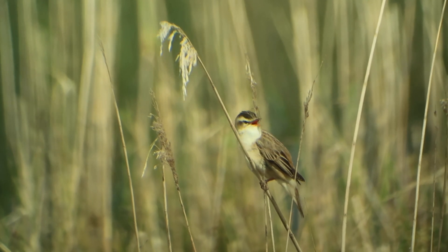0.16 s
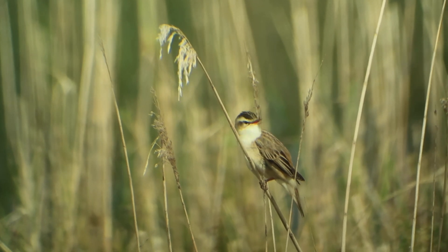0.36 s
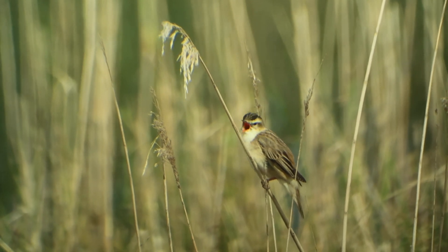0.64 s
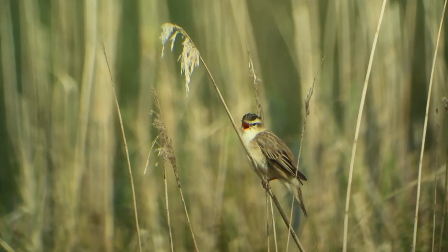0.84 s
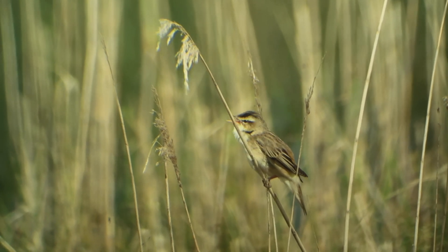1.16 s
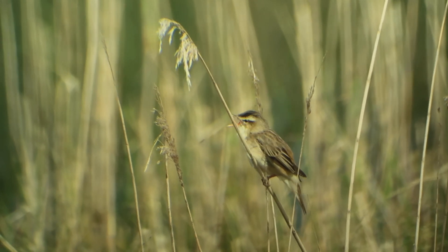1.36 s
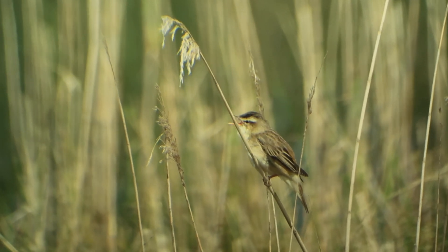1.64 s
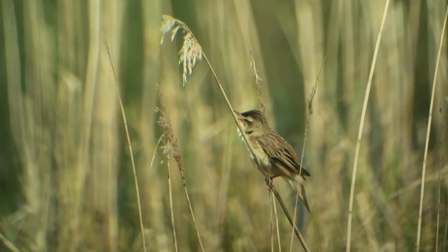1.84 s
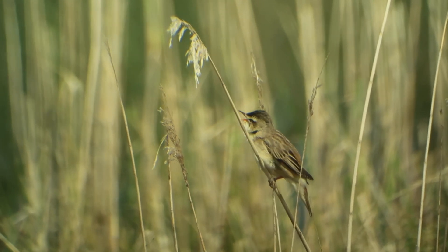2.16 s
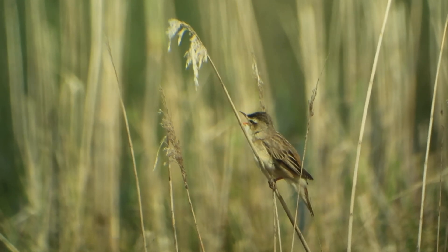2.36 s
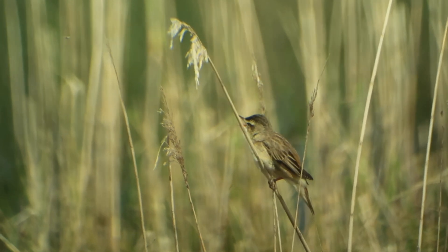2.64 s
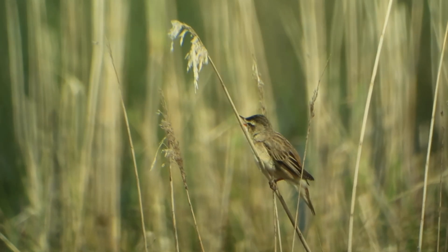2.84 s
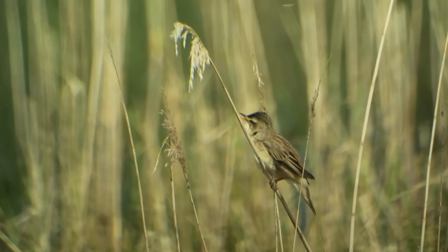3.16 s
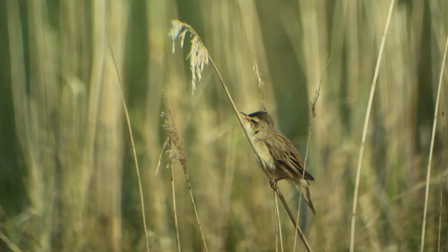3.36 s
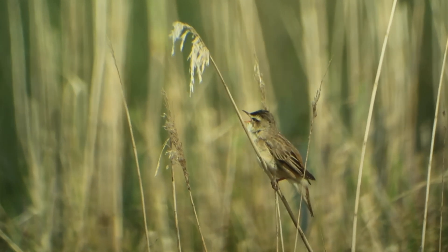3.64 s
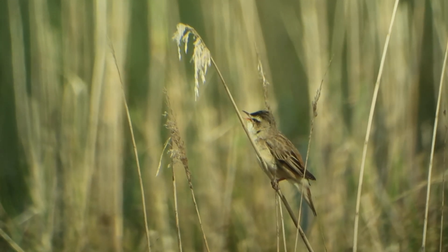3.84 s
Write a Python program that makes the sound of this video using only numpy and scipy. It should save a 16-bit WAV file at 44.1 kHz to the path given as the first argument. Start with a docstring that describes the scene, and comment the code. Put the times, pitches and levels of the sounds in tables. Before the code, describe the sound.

A small warbler sings fast harsh chattering churrs and hissing double chips in a breezy reedbed.

```python
"""Reedbed: a sedge warbler on a stem alternates hissing double chips with harsh four-note churrs.
A churr note mixes an arching harmonic buzz, a falling upper voice and noise; a chip is steadied noise.
A second warbler, off to the right, churrs along and comes to the fore; thin gliding whistles slip in.
The reeds scatter the song as decaying noise echoes and rush softly; faint high ticks are noise bursts.
From halfway on, eddies of wind thump on the microphone as brief swings amid puffs of dull noise."""
import sys
import numpy as np
from scipy import signal
from scipy.fft import rfft, irfft, next_fast_len
from scipy.io import wavfile
from scipy.ndimage import uniform_filter1d, map_coordinates

SR = 44100
rng = np.random.default_rng(int(sys.argv[2]) if len(sys.argv) > 2 else 0)


def put_to_file(sound):
    """Save the sound as 16-bit audio at rate SR, in the file named by the first command-line argument."""
    columns = np.atleast_2d(sound).T  # one column per channel
    safe = np.clip(columns, -1, 1)
    whole_steps = np.round(safe * 32767)
    wavfile.write(sys.argv[1], SR, whole_steps.astype(np.int16))


N = 176400
T = np.arange(N) / SR
HALF = np.array([[.5], [-.5]])  # splits a left-right difference between the ports


def amp(db):
    """Decibels to gain."""
    return 10 ** (np.asarray(db) / 20)


def unit(x):
    """Scale to rms 1."""
    return x / np.sqrt(np.mean(abs(x) ** 2) + 1e-20)


def along(points, hz):
    """Interpolate (Hz, value) points on a log frequency axis."""
    f, v = np.transpose(points)
    return np.interp(np.log(hz + 1), np.log(f + 1), v)


def filtered(x, response):
    """Multiply the spectrum of x by a complex response of frequency."""
    n = x.shape[-1]
    m = next_fast_len(n + 2048)
    hz = np.fft.rfftfreq(m, 1 / SR)
    return irfft(rfft(x, m) * response(hz), m)[..., :n]


def noise(spectrum, n, shift=1):
    """Coloured noise of rms 1, its spectrum scaled in frequency by shift."""
    white = rng.standard_normal(n)
    return unit(filtered(white, lambda hz: amp(along(spectrum, hz / shift))))


def steadied(x, span_s):
    """Noise with its swings in strength evened out, as in a chaotic oscillation."""
    power = uniform_filter1d(abs(signal.hilbert(x)) ** 2, max(1, int(span_s * SR)))
    return unit(x / np.sqrt(abs(power) + 1e-3))


def swell(t, length_s, edge):
    """Rounded rise and fall about t = 0; a higher edge steepens the flanks."""
    return np.exp(-abs(2 * t / length_s) ** edge)


def around(centre_s, reach_s):
    """Samples within reach of a time, and their times from it."""
    part = slice(max(0, int((centre_s - reach_s) * SR)), int((centre_s + reach_s) * SR))
    return part, T[part] - centre_s


def wander(t, size, per_s):
    """Smooth random course, unit normal points joined at per_s points a second."""
    return map_coordinates(rng.standard_normal(size), [(t - t[0]) * per_s], mode="wrap")


def churr_note(t, length_s, pitch_hz, fizz_db, rasp_db, upper_db, fall_hz_per_s, upper_share):
    """Two voices at once, an arching buzz and a falling whistle above it, with rasp and bright fizz."""
    # Colour of the buzz's overtones. Each row: frequency in Hz, level in dB.
    throat = [(1500, -49.5), (2250, -19), (2520, -31), (2800, 0), (3100, 0), (3450, -2.5), (3800, -27.5),
              (4100, -8.5), (4550, -7), (4900, 0.5), (5400, -29), (6100, -28.5), (7000, -40), (9000, -44.5)]
    # Colour of the rasp at its reference pitch. Each row: frequency in Hz, level in dB.
    rasp_colour = [(1500, -58.5), (2300, -15.5), (2650, -29.5), (3080, 4.5), (3600, -26), (4000, 1),
                   (4500, 9.5), (5100, 1), (5550, -34), (6600, -27.5), (7500, -41), (9500, -58.5),
                   (12500, -37), (16000, -64)]
    # Colour of the fizz. Each row: frequency in Hz, level in dB.
    fizz_colour = [(3500, -35.5), (4800, -6.5), (5350, 7.5), (5680, -4), (6050, 8.5), (6400, -10),
                   (6900, -28), (8000, -46.5), (10000, -49)]
    arch, sag, jitter_depth = .036, .014, .008  # shares of the pitch
    rasp_pitch_hz, rasp_length_ratio, rasp_lead_s = 787.6, 1.2, .0006
    upper_ratio, upper_lag_s, edge = 5.82, .001, 3

    u = np.clip(2 * t / length_s, -1.5, 1.5)
    jitter = jitter_depth * wander(t, 256, 700)
    hz = pitch_hz * (1 + rng.normal(0, .012) - arch * u ** 2 - sag * u + jitter)
    phase = 2 * np.pi * np.cumsum(hz) / SR
    buzz = unit(sum(amp(along(throat, k * hz)) * np.sin(k * phase + 2 * np.pi * rng.random())
                    for k in range(2, 11)))

    late_t = t - upper_lag_s
    upper_hz = upper_ratio * hz + fall_hz_per_s * late_t
    upper = unit(np.sin(2 * np.pi * (np.cumsum(upper_hz) / SR + rng.random())))

    rasp = steadied(noise(rasp_colour, len(t), pitch_hz / rasp_pitch_hz), .004)
    rough = amp(rasp_db) * rasp + amp(fizz_db) * noise(fizz_colour, len(t))

    return (buzz * swell(t, length_s, edge)
            + amp(upper_db) * upper * swell(late_t, length_s * upper_share, edge)
            + rough * swell(t + rasp_lead_s, length_s * rasp_length_ratio, 2))


def churrs(rows, notes, upper_share):
    """Each churr is a run of four quick notes with its own accents."""
    out = np.zeros(N)
    for first_s, levels_db, pitch_hz, fizz_db, *voice in rows:
        for db, (delay_s, length_s, step_hz, note_fizz_db) in zip(levels_db, notes):
            part, t = around(first_s + delay_s, .023)
            note = churr_note(t, length_s, pitch_hz + step_hz, fizz_db + note_fizz_db, *voice, upper_share)
            out[part] += amp(db) * note
    return out


def chips():
    """Pairs of chaotic hiss bursts, the second mostly stronger, each with a weak octave by squaring."""
    # Double chips; the overtone is strong while the bird faces the microphone.
    # Each row: centre of first note in seconds, levels of the two notes in dB, centre frequency in Hz,
    # overtone in dB.
    chip_rows = [(0.024, (-44, -39.5), 5440, -24), (0.113, (-44.5, -43), 5230, -23.5), (.585, (-49.5, -43),
                 5390, -27.5), (.662, (-45.5, -41.5), 5540, -23), (0.749, (-42.5, -39.5), 5580, -28),
                 (.833, (-44, -41), 5500, -26.5), (.922, (-43, -41.5), 5420, -32), (1.009, (-43.5, -45),
                 5460, -28), (1.487, (-44, -42.5), 5470, -52), (1.564, (-46, -43), 5530, -36),
                 (1.650, (-43.5, -43.5), 5450, -35.5), (1.732, (-46.5, -46), 5460, -38), (1.829, (-48, -43),
                 5550, -41), (2.471, (-44, -41.5), 5330, -39), (2.555, (-43.5, -40), 5430, -59),
                 (2.649, (-45, -41), 5460, -59), (2.729, (-43.5, -41), 5390, -66), (2.826, (-44, -43),
                 5600, -38), (2.913, (-40.5, -41.5), 5410, -45.5)]
    # Notes of a chip. Each row: delay in seconds, length in seconds.
    chip_notes = [(0, .0095), (.0205, .0148)]
    # Colour of the hiss at its reference centre. Each row: frequency in Hz, level in dB.
    hiss_colour = [(1400, -41.5), (2300, -13), (2700, -23), (3150, -10.5), (3700, -27), (4300, -3.5),
                   (4900, 2.5), (5800, 1), (6700, 4), (7200, -25), (8000, -20.5), (9000, -61), (16000, -81)]
    # Colour of the octave. Each row: frequency in Hz, level in dB.
    octave_colour = [(8000, -16), (10500, -15.5), (12500, -11.5), (13800, 11), (15000, -11)]
    reference_hz = 5414

    out = np.zeros(N)
    for first_s, levels_db, centre_hz, overtone_db in chip_rows:
        for db, (delay_s, length_s) in zip(levels_db, chip_notes):
            part, t = around(first_s + delay_s, .023)
            hiss = steadied(noise(hiss_colour, len(t), centre_hz / reference_hz), .003)
            squared = (signal.hilbert(hiss) ** 2).real
            octave = unit(filtered(squared, lambda hz: amp(along(octave_colour, hz))))
            out[part] += amp(db) * swell(t, length_s, 2.1) * (hiss + amp(overtone_db) * octave)
    return out


def near_warbler():
    """The near bird's churrs, with a brief upper voice, and its chips."""
    # Churrs. Each row: centre of first note in seconds, levels of the four notes in dB, pitch in Hz,
    # fizz in dB, rasp in dB, upper voice in dB, slope of the upper voice in Hz per second.
    churr_rows = [(.206, (-44.5, -43, -44.5, -45), 765, -5.5, -5, -11, -20000),
                  (.389, (-46, -44, -43.5, -47), 766.6, -16, -8, -3, -15000),
                  (1.115, (-52, -48, -49.5, -47.5), 793, 0, 2.5, 0, -50000),
                  (1.279, (-49, -47.5, -51.5, -47.5), 777.4, -20, -0.5, 1, -30000),
                  (1.953, (-51, -47, -47.5, -47), 786.6, -17, -1.5, 1.5, -60000),
                  (2.103, (-49, -46.5, -49.5, -47.5), 822, -20, -3.5, 1, -50000),
                  (2.288, (-51.5, -50, -49, -48.5), 782.3, -9.5, 2.5, 2.5, -60000),
                  (3.017, (-52.5, -48.5, -51.5, -50.5), 777, 5, 5.5, 8, -80000),
                  (3.183, (-48.5, -48.5, -48.5, -50), 790, -8, 5, 3.5, -90000),
                  (3.356, (-52.5, -48, -53, -48.5), 785, -7, 3, 5.5, -100000),
                  (3.528, (-49.5, -53, -51, -49), 783, -4.5, 6.5, 1.5, -90000),
                  (3.704, (-53, -52.5, -52, -51.5), 781.4, -0.5, 1, 6.5, -80000),
                  (3.866, (-50, -47, -51, -50.5), 779, -14, 2.5, 2, -80000)]
    # Notes of a churr. Each row: delay in seconds, length in seconds, pitch above the churr's in Hz,
    # added fizz in dB.
    churr_notes = [(0, .0095, 0, 0), (.0213, .0105, -3, -6), (.0475, .0115, 6, -7), (.0765, .0125, -3, -8)]
    return churrs(churr_rows, churr_notes, upper_share=.68) + chips()


def second_warbler():
    """The second bird's churrs, with one set of accents and one voice for all."""
    # Churrs. Each row: centre of first note in seconds, level before accents in dB, pitch in Hz.
    far_churrs = [(0.06, -58.5, 779), (0.275, -64.5, 777), (0.458, -65.5, 785), (0.65, -65.5, 803),
                  (0.824, -66.5, 813), (1.197, -72.5, 780), (1.438, -65.5, 793), (1.633, -65.5, 808),
                  (1.827, -61, 784), (1.993, -56.5, 780), (2.173, -57, 781), (2.35, -56.5, 778),
                  (2.53, -59, 782), (2.830, -50, 767), (2.989, -48.5, 783), (3.174, -50.5, 792),
                  (3.361, -48, 790.5), (3.534, -50, 786.5), (3.7, -49.5, 767), (3.887, -49.5, 782)]
    # Notes of a churr. Each row: delay in seconds, length in seconds, pitch above the churr's in Hz,
    # added fizz in dB.
    far_notes = [(0, .018, -10, 0), (.022, .015, 0, 0), (.045, .014, 5, 0), (.067, .013, -15, 0)]
    # Accents of the four notes, in dB.
    accents_db = np.array([-8.5, 0.5, 1, -2.5])
    fizz_db, rasp_db, upper_db, fall_hz_per_s = -9.5, -3, 2.5, -12000

    rows = [(s, db + accents_db, pitch_hz, fizz_db, rasp_db, upper_db, fall_hz_per_s)
            for s, db, pitch_hz in far_churrs]
    return churrs(rows, far_notes, upper_share=1)


def whistles():
    """Short sine glides with a slight random quaver."""
    # Each row: centre in seconds, length in seconds, level in dB, pitch in Hz, glide in Hz per second.
    whistle_rows = [(1.036, 0.062, -48, 5550, -1800), (1.45, 0.015, -57, 6030, 74997),
                    (2.828, 0.028, -56, 5260, -1000), (2.892, 0.021, -55.5, 5370, -6),
                    (2.967, 0.027, -49.5, 5270, -5000)]
    quaver_hz, quaver_per_s = 70, 500

    out = np.zeros(N)
    for s, length_s, db, pitch_hz, glide_hz_per_s in whistle_rows:
        part, t = around(s, length_s)
        hz = pitch_hz + glide_hz_per_s * t + quaver_hz * wander(t, 64, quaver_per_s)
        tone = unit(np.sin(2 * np.pi * np.cumsum(hz) / SR))
        out[part] += amp(db) * swell(t, length_s, 2.5) * tone
    return out


def placed(x, lead, pan):
    """A source as the left and right ports hear it, by phase lead and level per frequency."""
    return filtered(x, lambda hz: amp(HALF * along(pan, hz)) * np.exp(1j * HALF * along(lead, hz)))


def scatter(x, t60_s):
    """Diffuse echo from swaying stems: a decaying noise tail, redrawn for every sixth of a second."""
    out = np.zeros((2, N + SR))
    t = np.arange(SR // 3) / SR
    block = SR // 6
    for i in range(0, N, block):
        decay = amp(-60 * t / t60_s) * (1 - np.exp(-t / .004))
        tail = rng.standard_normal((2, len(t))) * decay
        echo = signal.fftconvolve(x[None, i:i + block], tail / np.linalg.norm(tail[0]), axes=1)
        out[:, i:i + echo.shape[1]] += echo
    return out[:, :N]


def eddies():
    """Each eddy shoves the diaphragm for little more than one swing, sharply, then settling and slowing."""
    # Each row: time in seconds, envelope peak in dB, pitch in Hz, left-right difference in dB.
    eddy_rows = [(2.082, -40, 101.7, 5.5), (2.254, -26.5, 106, 8.5), (2.391, -38, 138, 4),
                 (2.416, -28.5, 156.7, 4.5), (2.457, -21.5, 143.2, 7), (2.482, -24, 141.5, 6.5),
                 (2.641, -34, 134.5, 0.5), (2.654, -37.5, 250, 7), (2.674, -40.5, 134, 6.5),
                 (2.715, -36, 117.7, -12), (2.753, -29.5, 197.2, 6), (2.794, -43.5, 114, -12),
                 (2.922, -42.5, 101.6, -1.5), (2.943, -32, 163.5, -9), (3.321, -40.5, 112.3, 10.5),
                 (3.601, -24.5, 140.4, -6.5), (3.659, -32, 152.5, 6), (3.901, -30, 127.3, 6.5),
                 (3.945, -34.5, 177, 7)]
    rise_cycles, fall_cycles, skew_cycles, slowing_share = .28, .42, .16, .201

    out = np.zeros((2, N))
    for s, db, hz, pan_db in eddy_rows:
        part, t = around(s, .05)
        cycles = hz * t
        shape = np.exp(1 - np.hypot(1, cycles / np.where(t < 0, rise_cycles, fall_cycles)))
        port_phase = HALF * rng.normal(0, skew_cycles)
        phase = np.cumsum(hz * (1 - slowing_share * np.tanh(cycles))) / SR + rng.random()
        out[:, part] += amp(db + HALF * pan_db) * shape * np.sin(2 * np.pi * (phase + port_phase))
    return out


def puffs():
    """Dull turbulence flutters on the microphone, mostly alike in both ports but harder on one."""
    # Each row: centre in seconds, length in seconds, level before the low-pass in dB,
    # left-right difference in dB.
    puff_rows = [(0.091, 0.026, -59, -3), (2.098, 0.04, -51.5, 6), (2.276, 0.04, -47.5, 5),
                 (2.347, 0.043, -46.5, 3), (2.407, 0.05, -42.5, 5.5), (2.475, .05, -40.5, 6),
                 (2.554, 0.14, -53.5, 7), (2.653, 0.054, -40.5, 9), (2.763, 0.051, -48.5, -5),
                 (2.85, 0.16, -56, -2), (2.951, 0.05, -46.5, -6), (3.014, 0.14, -54.5, 5),
                 (3.61, 0.028, -39, -3), (3.658, 0.037, -46, 8), (3.931, 0.05, -48.5, 9),
                 (3.977, 0.15, -49, -3.5)]
    # Colour of the turbulence before the low-pass. Each row: frequency in Hz, level in dB.
    buffet = [(20, -29), (45, -12.5), (80, -8), (125, -7.5), (180, -13.5), (250, -18), (400, -27),
              (700, -42.5), (2000, -84)]
    edge, side_db, top_hz = 1.7, -11, 416

    push = np.sqrt(sum((amp(db + HALF * pan_db) * swell(T - s, length_s, edge)) ** 2
                       for s, length_s, db, pan_db in puff_rows))
    mid = steadied(noise(buffet, N), .02)
    side = amp(side_db) * noise(buffet, N)
    flutter = push * np.array([mid + side, mid - side])
    return filtered(flutter, lambda hz: 1 / np.sqrt(1 + (hz / top_hz) ** 4))


def reedbed():
    """A soft low rush, shared in part by the ports, with a faint independent rustle above it."""
    # Colour of the breeze in the reedbed. Each row: frequency in Hz, level in dB.
    air = [(15, -47.5), (25, -14), (79, -2.5), (140, 0), (214, -3), (437, -2.5), (586, -7), (716, -7),
           (1150, -10), (1630, -17), (2000, -22.5), (2600, -54.5), (4400, -120)]
    # Likeness of the breeze in the ports. Each row: frequency in Hz, left-right correlation (0 to 1).
    air_alike = [(60, 1), (160, 0.9), (410, 0.23), (1080, 0.0054), (2820, 0.14), (7370, 0.25)]
    # Colour of the rustle. Each row: frequency in Hz, level in dB.
    rustle_colour = [(1200, -27.5), (2000, -5), (3000, -5), (4600, -9), (5600, -7), (7200, -6),
                     (8700, -20.5), (11000, -28.5), (14000, -28), (16000, -39.5)]
    air_db, rustle_db = -62, -70

    def mid_side_gains(hz):
        """Shares of mid and side that give the likeness."""
        turn = np.arccos(np.clip(along(air_alike, hz), 0, 1)) / 2
        return np.array([np.cos(turn), np.sin(turn)])

    mid, side = filtered(np.array([noise(air, N), noise(air, N)]), mid_side_gains)
    rush = amp(air_db) * np.array([mid + side, mid - side])
    rustle = amp(rustle_db) * np.array([noise(rustle_colour, N), noise(rustle_colour, N)])
    return rush + rustle


def ticks():
    """Tiny narrow noise bursts far above the song, perhaps a distant small bird."""
    # Each row: centre in seconds, level in dB.
    tick_rows = [(.647, -69), (.728, -71), (1.04, -76), (1.092, -74), (1.286, -70), (1.45, -75),
                 (1.888, -71), (1.93, -61.5), (2.003, -71), (2.245, -74), (2.605, -66.5), (3.73, -68),
                 (3.887, -70)]
    # Colour of a tick. Each row: frequency in Hz, level in dB.
    tick_band = [(7200, -41), (7850, -2), (8100, 2.5), (8600, -45.5)]

    out = np.zeros(N)
    for s, db in tick_rows:
        part, t = around(s, .023)
        burst = steadied(noise(tick_band, len(t)), .003)
        out[part] += amp(db) * swell(t, .017, 2) * burst
    return out


def scene():
    """Both birds among the reeds, with the wind; the whistles come from the second bird's side."""
    # Phase lead of the left port, near and second bird. Each row: frequency in Hz, lead in radians.
    near_lead = [(3100, -0.28), (4100, -0.77), (4550, -1.14), (5000, -0.93), (5500, 1), (6000, -1.2),
                 (6700, -0.76)]
    far_lead = [(3100, -1), (4100, -1.64), (4550, -1.5), (6000, -2)]
    # Level between the ports, near and second bird. Each row: frequency in Hz, left-right in dB.
    near_pan = [(3100, -.7), (4100, 2), (4550, -5), (5000, 0.5), (5500, -2), (6000, -1.5), (6700, 0)]
    far_pan = [(3100, -3.5), (4100, -4.5), (4550, -3.5), (5500, -1)]
    reeds_t60_s, reeds_db = .07, -13.5
    field_t60_s, field_db = .25, -21

    near = near_warbler()
    far = second_warbler() + whistles()
    song = near + far
    echo = amp(reeds_db) * scatter(song, reeds_t60_s) + amp(field_db) * scatter(song, field_t60_s)
    birds = placed(near, near_lead, near_pan) + placed(far, far_lead, far_pan) + echo
    return birds + eddies() + puffs() + reedbed() + ticks()


def record(dry):
    """The microphone's colour and band limit."""
    # Bass roll-off and a narrow dip. Each row: frequency in Hz, gain in dB.
    microphone = [(15, -12.5), (30, -7.5), (55, -1), (5000, -0.5), (6000, -2), (6270, -13.5), (6550, -7),
                  (7000, -8)]
    top_hz = 14700
    return filtered(dry, lambda hz: amp(along(microphone, hz)) * (hz < top_hz))


dry = scene()
out = record(dry)
put_to_file(out)
```